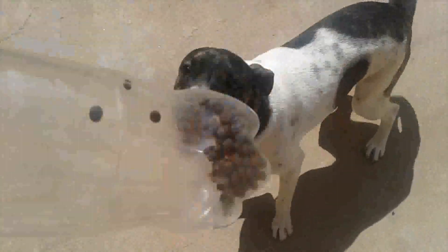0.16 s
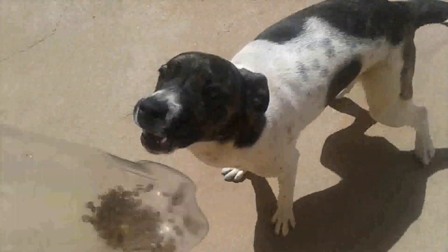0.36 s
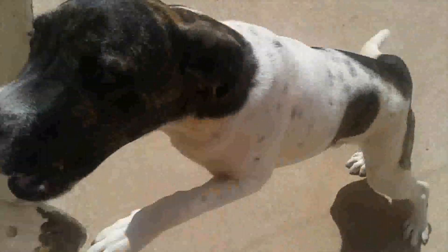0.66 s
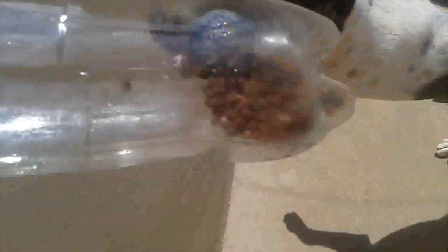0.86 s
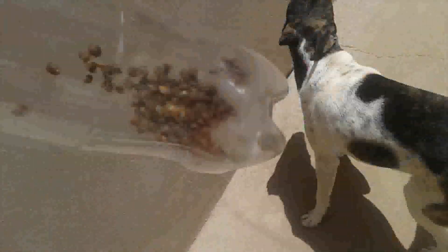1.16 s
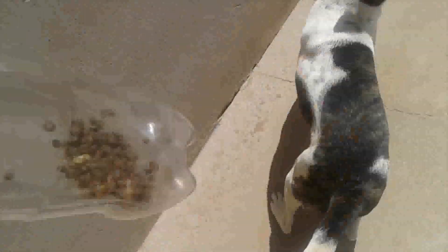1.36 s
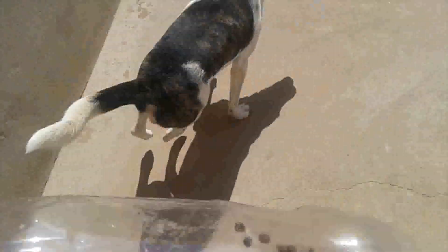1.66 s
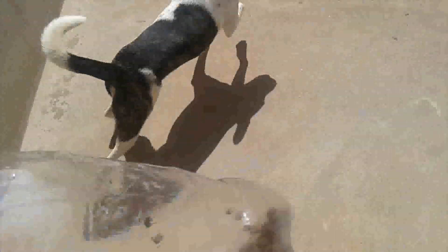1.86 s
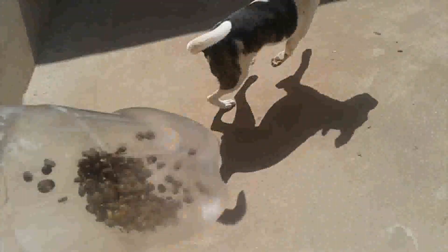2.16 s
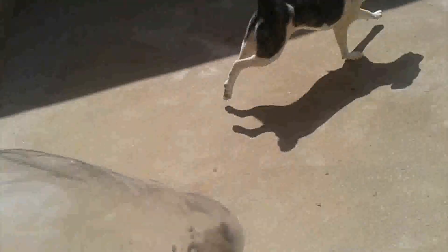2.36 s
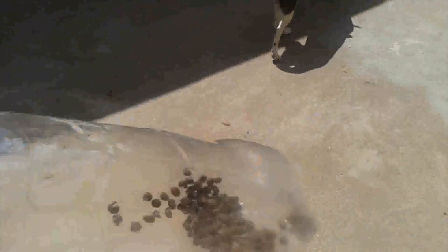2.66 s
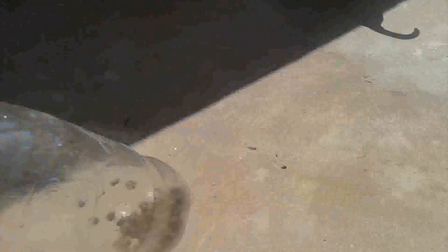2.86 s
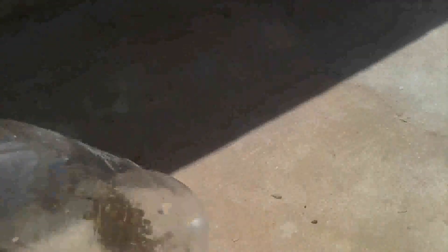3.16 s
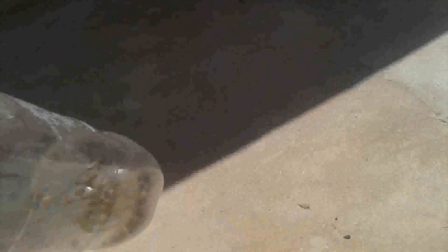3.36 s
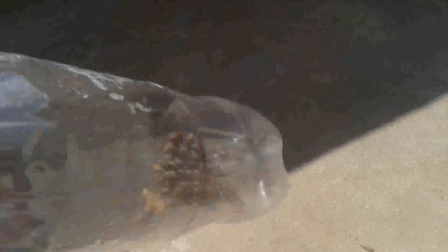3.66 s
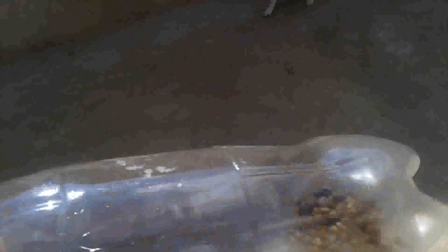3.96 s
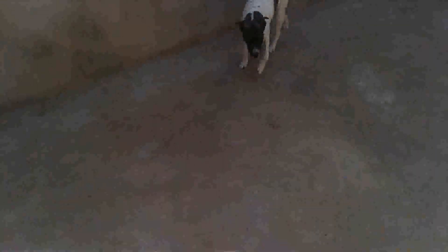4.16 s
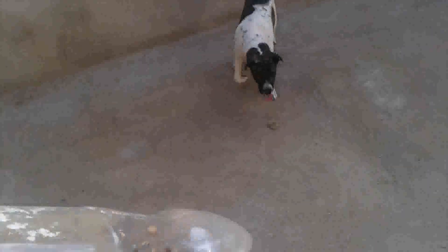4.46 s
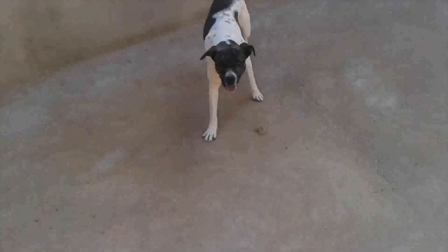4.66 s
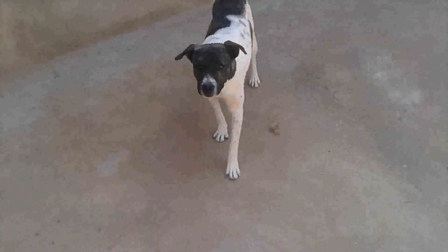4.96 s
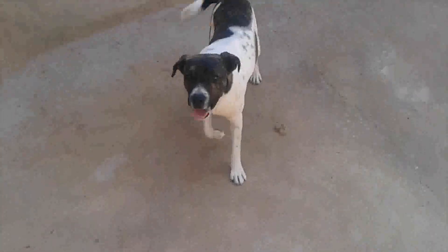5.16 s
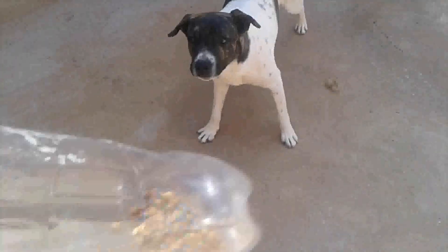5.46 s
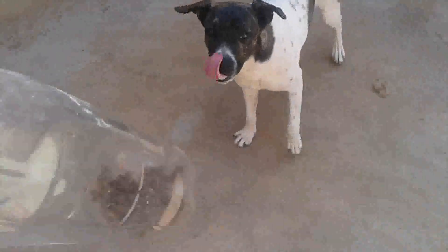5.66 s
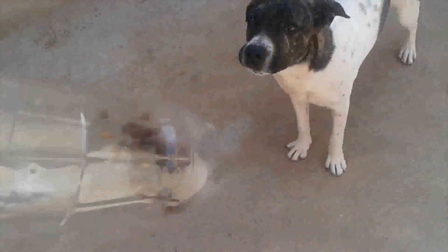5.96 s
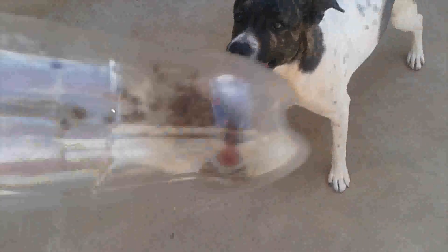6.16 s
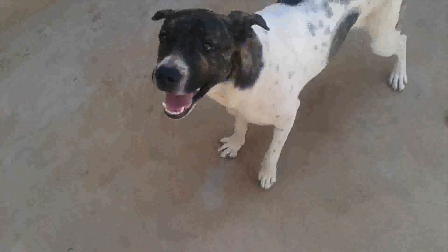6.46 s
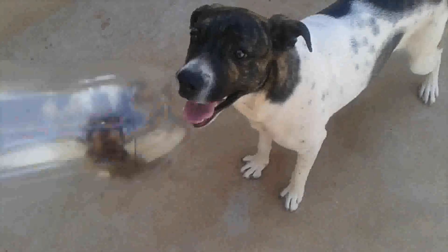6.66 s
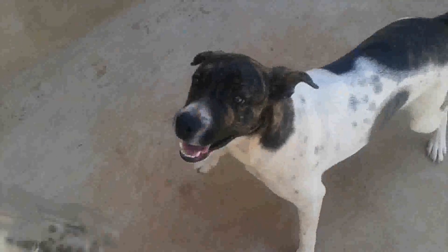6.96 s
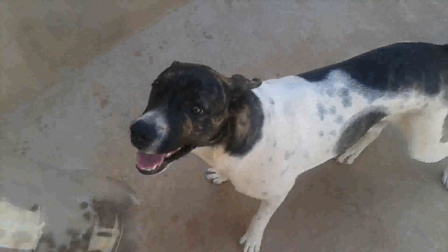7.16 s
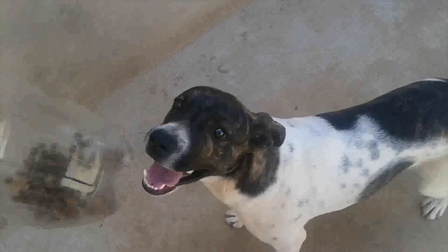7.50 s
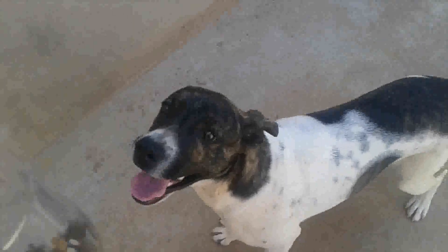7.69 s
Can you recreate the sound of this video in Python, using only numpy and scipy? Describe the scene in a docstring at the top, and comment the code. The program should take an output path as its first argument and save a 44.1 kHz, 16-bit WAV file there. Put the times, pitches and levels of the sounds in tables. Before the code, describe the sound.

Dry kibble is shaken briskly in a hard plastic bottle close by, crunchy rattling bursts about eight a second, with one brief pause near the end.

```python
"""A handful of dry kibble is shaken in a capped plastic bottle, close to the microphone.
About eight times a second the heap lands: a shower of random impacts excites the wall's short modes,
with another ring each time, and pellets tumble between. They settle once in a short pause near 6.5 s,
then the shaking goes on to the end. Filtered noise gives the air's tail and a quiet yard;
wavering sines give a faint, uneven mains hum and drone that nearly vanish near 5.7 s."""
import sys
import numpy as np
from scipy import signal
from scipy.fft import rfft, irfft
from scipy.io import wavfile
from scipy.ndimage import uniform_filter1d

SR = 44100
rng = np.random.default_rng(int(sys.argv[2]) if len(sys.argv) > 2 else 0)


def to_wav(s):
    """Save 16-bit WAV."""
    ch = np.atleast_2d(s).T  # columns
    pcm = np.round(np.clip(ch, -1, 1) * 32767)  # PCM
    wavfile.write(sys.argv[1], SR, pcm.astype(np.int16))


N = 345303
TIME = np.arange(N) / SR
GRID_HZ = np.arange(40, 16000, 40)

# landings of the heap on the wall: first contact_s, relative level_db, crest_delay_s, fall_s,
# abruptness (0-1)
LANDINGS = [(0.022, -15.5, 0.01, 0.01, 0.63), (0.122, -16.5, 0.012, 0.0099, 0.8),
            (0.228, -15, 0.017, 0.01, 0.8), (0.384, -17.5, 0.031, 0.024, 0.4),
            (0.511, -15, 0.02, 0.026, 0.6), (0.628, -12.0, 0.011, 0.02, 0.5),
            (0.691, -14, 0.024, 0.031, 0.46), (0.833, -16.5, 0.035, 0.025, 0.74),
            (0.982, -12, 0.033, 0.025, 0.6), (1.128, -10.5, 0.019, 0.029, 0.4),
            (1.296, -12, 0.0165, 0.02, 0.0), (1.399, -13, 0.022, 0.014, 0.8),
            (1.54, -14, 0.019, 0.019, 0.88), (1.663, -13, 0.022, 0.02, 0.07),
            (1.811, -13.5, 0.013, 0.018, 0.0), (1.922, -13.5, 0.042, 0.021, 0.63),
            (2.094, -15.5, 0.021, 0.011, 0.9), (2.202, -14.5, 0.0058, 0.019, 0.6),
            (2.333, -12.5, 0.013, 0.013, 0.7), (2.44, -13.5, 0.014, 0.024, 0.0),
            (2.558, -15.5, 0.041, 0.022, 0.65), (2.702, -13.0, 0.016, 0.02, 0.35),
            (2.849, -13, 0.026, 0.015, 0.5), (2.972, -10.5, 0.017, 0.02, 0.2),
            (3.079, -12.5, 0.024, 0.033, 0.7), (3.221, -13, 0.01, 0.021, 0),
            (3.341, -12.5, 0.013, 0.02, 0.2), (3.455, -13.5, 0.023, 0.022, 0.2),
            (3.591, -13.5, 0.017, 0.016, 0.57), (3.698, -12.0, 0.03, 0.016, 0.53),
            (3.836, -16, 0.019, 0.024, 0.36), (3.954, -13.0, 0.016, 0.016, 0.36),
            (4.124, -20.5, 0.026, 0.011, 0.5), (4.258, -14.5, 0.028, 0.0088, 0.57),
            (4.396, -17.5, 0.014, 0.02, 0.55), (4.49, -15.0, 0.019, 0.016, 0.0),
            (4.605, -13, 0.025, 0.011, 0.05), (4.732, -14.5, 0.013, 0.021, 0.35),
            (4.839, -11.5, 0.034, 0.0079, 0.36), (4.978, -13, 0.013, 0.019, 0.2),
            (5.114, -12, 0.014, 0.015, 0.6), (5.238, -12, 0.0083, 0.016, 0.2),
            (5.361, -15, 0.029, 0.012, 0.57), (5.472, -13.0, 0.026, 0.0087, 0.45),
            (5.606, -14, 0.015, 0.012, 0.5), (5.73, -13, 0.014, 0.012, 0.05),
            (5.83, -13.5, 0.02, 0.014, 0.07), (5.942, -14.5, 0.025, 0.037, 0.46),
            (6.068, -13.5, 0.012, 0.021, 0.4), (6.192, -12.0, 0.006, 0.016, 0.6),
            (6.301, -13.5, 0.03, 0.018, 0.67), (6.467, -22, 0.011, 0.051, 0.2),
            (6.865, -14.5, 0.021, 0.0095, 0.6), (7, -12, 0.029, 0.034, 1.0),
            (7.147, -10.5, 0.022, 0.014, 0), (7.248, -10.5, 0.023, 0.022, 0.4),
            (7.405, -13, 0.027, 0.0092, 0.2), (7.534, -14.5, 0.038, 0.0083, 0.99),
            (7.725, -18, 0.012, 0.021, 0), (7.813, -17.5, 0.033, 0.008, 0)]


def undb(db):
    """The decibel is logarithmic: 20 dB is a factor of ten in amplitude."""
    return 10 ** (np.asarray(db) / 20)


def unit(x):
    """Energy normalization: scale so that the squares sum to one."""
    return x / np.sqrt(np.sum(x ** 2))


def curve(rows):
    """Linear interpolation in time: join (s, value) rows by straight lines."""
    return np.interp(TIME, *np.transpose(rows))


def spectrum(points):
    """Logarithmic frequency scale: join (Hz, dB) points by straight lines on it."""
    hz, db = np.transpose(points)
    return np.interp(np.log(GRID_HZ), np.log(hz), db)


def walk(rate):
    """Slow random fluctuation: normal values at the rate in Hz, joined by straight lines."""
    knots = np.arange(0, N / SR + 1, 1 / rate)
    return np.interp(TIME, knots, rng.standard_normal(len(knots)))


def burst(t60, size=3072):
    """High modal density: crowded modes act as noise that falls 60 dB in t60 seconds."""
    age = np.arange(size) / SR
    decay = np.exp(-np.log(1000) * age / t60)
    return unit(rng.standard_normal(size) * decay)


def colour(x, db, size=1024):
    """Minimum-phase filtering: a causal response of unit energy, shaped by a gain in dB on GRID_HZ."""
    gain = undb(np.interp(np.fft.rfftfreq(size, 1 / SR), GRID_HZ, db))
    # folding the cepstrum onto positive times makes the response causal
    cepstrum = irfft(np.log(gain))[:size // 2]
    cepstrum[1:] *= 2
    response = unit(irfft(np.exp(rfft(cepstrum, size))))
    return signal.fftconvolve(x, response)[:len(x)]


def swell(lag, rise, fall):
    """Growth and decay of power: rises to one at lag zero and drains away."""
    shape = 1.346  # 1 = pointed crest, 2 = rounded
    return np.exp(-np.abs(lag / np.where(lag < 0, rise, fall)) ** shape)


def heap_power():
    """Superposed impact power: a few pellets lead, a front arrives at once, the rest swells; some tumble on."""
    rise_s, rise_per_delay = .014, .15  # a heap that arrives spread out swells more slowly
    tumble_db, tumble_rise_s, tumble_fall_s = -13, .028, 0.11  # loose pellets set rolling
    lead_db, front_db, front_s = -7, 1, 0.0052  # for a fully abrupt landing
    power = np.full(N, 1e-8)
    for contact, db, delay, fall, abrupt in LANDINGS:
        near = slice(max(0, int((contact - .15) * SR)), int((contact + .6) * SR))
        age = TIME[near] - contact
        lead = undb(lead_db * abrupt * (age < 0)) ** 2
        shower = swell(age - delay, rise_s + rise_per_delay * delay, fall) * lead
        front = (abrupt * undb(front_db)) ** 2 * (age > 0) * np.exp(-np.abs(age) / front_s)
        tumble = swell(age - delay, tumble_rise_s, tumble_fall_s) * undb(tumble_db) ** 2
        power[near] += undb(db) ** 2 * (front + shower + tumble)
    return power


def impacts(power, full_rate, crowding, scatter_db, even_s, first_db, clack_db, stray_rate, stray_db):
    """Random point process: a harder landing brings more and stronger blows, and stray pellets stand out."""
    # short clacks, loud and soft, within and between the landings: time_s, relative level_db
    clacks = [(0.406, -26), (0.443, -23), (0.605, -13.5), (1.219, -16.5), (1.411, -11), (1.695, -10.5),
              (1.835, -12.5), (2.951, -19.5), (3.617, -22), (4.585, -17.5), (5.083, -18.5), (5.5, -13),
              (5.955, -10.5), (6.087, -13.5), (6.469, -16), (6.482, -18), (6.524, -21.5), (6.826, -29.5),
              (6.939, -20), (7.035, -20), (7.32, -15), (7.39, -18)]
    rate = full_rate * (power / power.max()) ** crowding  # blows per second
    hits = (rng.random(N) < rate / SR) * undb(scatter_db * rng.standard_normal(N))
    # the pellets share the heap's momentum, so a hard hit leaves less for its neighbours
    width = int(even_s * SR) + 1
    share = uniform_filter1d(uniform_filter1d(hits ** 2, width), width)
    hits *= np.sqrt(power / (np.abs(share) + 1e-6))
    # strays fly freely while the heap is off the wall
    airborne = power < np.mean(power)
    strays = rng.random(N) < stray_rate / SR
    hits += strays * airborne * np.sqrt(power) * undb(stray_db)
    # first contact of each landing
    for contact, db, _, _, abrupt in LANDINGS:
        hits[int(contact * SR)] += abrupt * undb(db + first_db)
    for s, db in clacks:
        hits[int(s * SR)] += undb(db + clack_db)
    return hits


def landing_spectrum(s, vary_db, vary_hz, peak_db, width_hz):
    """Load-dependent resonance: the heap loads the wall where it lands, so each landing rings differently."""
    # what the bottle radiates when struck: frequency_hz, relative density_db (per Hz)
    bottle = [(60, -43), (140, -24.5), (420, -12), (590, -10.5), (790, -4), (1030, -0.26), (1300, -4),
              (1600, -2.4), (2650, -4), (3300, -1.5), (5700, -6), (8400, -20), (11500, -32.5),
              (15000, -40.5)]
    # centres of thump, base ring, side-wall ring, pellet contact and crisp edge: frequency_hz
    region_hz = [420, 950, 1850, 3700, 8000]
    # ring as the bottle tilts and the heap lands elsewhere, before chance variation:
    # time_s, base_ring_db, side_ring_db, thump_and_crisp_db, side_ring_hz
    wall_ring = [(0.0, -8, 1, 0, 1920), (0.45, 1.5, 9.5, 5, 1750), (0.87, -0.5, 5.5, 3, 1730),
                 (1.01, -8, -2.5, 0.5, 2330), (1.16, -6, 9, 3.5, 1670), (1.55, -3.5, 4.5, 3.5, 2300),
                 (2.1, 0.5, -1.5, -2, 2110), (3.3, 0, 0.5, 0, 2070), (4.0, 0.5, -2, -3, 1970),
                 (4.9, 0, -2.5, -3.5, 1840), (5.701, 2, 1.5, 0.5, 2350), (5.97, 0, 6, -2.5, 1610),
                 (6.25, -2.5, 3, -2, 2330), (6.5, 4, 12, -0.5, 1530), (6.9, -5.5, 2.5, -1, 1650),
                 (7.8, 2.5, 3.5, -2, 1680)]
    thump_db = 1.4  # the thump's lead over the crisp edge, before chance variation
    times, *columns = np.transpose(wall_ring)
    base, side, crisp, side_hz = (np.interp(s, times, column) for column in columns)
    chance = rng.standard_normal(len(region_hz) + 1)
    region_db = np.array([thump_db + crisp, base, side, 0, crisp]) + vary_db * chance[1:]
    peak_hz = side_hz + vary_hz * chance[0]
    peak = peak_db / (1 + (2 * (GRID_HZ - peak_hz) / width_hz) ** 2)
    return spectrum(bottle) + spectrum(list(zip(region_hz, region_db))) + peak


def spot_ring(wall_db, spot_db, width_hz, crack_t60, ring_t60, ring_db, count=200):
    """Position-dependent modal excitation: a spot favours its own modes in a crack and a short ring."""
    favour = np.interp(GRID_HZ / width_hz, np.arange(count), rng.standard_normal(count))
    decay = burst(crack_t60) + undb(ring_db) * burst(ring_t60)
    return unit(colour(decay, wall_db + spot_db * favour))


def rattle(hits, count=8):
    """Impulse-response convolution: in each shake the pellets strike a fresh handful of wall spots."""
    spot = rng.integers(0, count, N)
    crests = np.array([contact + delay for contact, _, delay, *_ in LANDINGS])
    # each shake extends halfway to its neighbours' crests
    edges = np.r_[0, (crests[:-1] + crests[1:]) / 2 * SR, N].astype(int)
    out = np.zeros(N + SR)
    for crest, start, end in zip(crests, edges, edges[1:]):
        wall_db = landing_spectrum(crest, vary_db=1, vary_hz=109, peak_db=4.5, width_hz=310)
        for k in range(count):
            ring = spot_ring(wall_db, spot_db=4.5, width_hz=200, crack_t60=0.012, ring_t60=0.037, ring_db=3.0)
            spot_hits = hits[start:end] * (spot[start:end] == k)
            sound = signal.fftconvolve(spot_hits, ring)
            out[start:start + len(sound)] += sound
    return out[:N]


def snap(hits, power, hardening, t60, edge_hz):
    """Contact time sets bandwidth: faster pellets touch more briefly, so a landing's crest is brightest."""
    hard = hits * (power / power.max()) ** hardening
    band = signal.butter(2, [min(edge_hz, 9000), 11000], "band", fs=SR, output="sos")
    bright = signal.sosfilt(band, burst(t60))
    return signal.fftconvolve(hard, unit(bright))[:N]


def bottle_air(wall):
    """Reverberation: the air inside the bottle rings on as a decaying tail of the wall's sound."""
    return signal.fftconvolve(wall, burst(t60=0.21, size=16384))[:N]


def hum(hum_db, drone_db):
    """Frequency and amplitude modulation: an uneven mains hum wavers, with a weaker drone just above it."""
    # shared level of hum and drone before their wavering and gains: time_s, relative level_db
    hum_levels = [(0.1, -52), (0.6, -44), (1.1, -48.5), (1.7, -52), (2.3, -45), (3.0, -45.5), (3.7, -45),
                  (4.3, -49.5), (5.0, -44), (5.4, -53), (5.7, -71), (6.1, -54), (6.5, -53), (6.9, -45.5),
                  (7.6, -44)]
    mains_hz = 120.0 + 0.48 * walk(7.1)
    mains = np.sin(2 * np.pi * np.cumsum(mains_hz) / SR) * undb(hum_db + 2.8 * walk(10))
    drone_hz = 146.0 + 2.4 * walk(9)
    drone = np.sin(2 * np.pi * np.cumsum(drone_hz) / SR) * undb(drone_db + 1.9 * walk(4.6))
    # the root of two gives a sine of unit amplitude an rms of one
    return np.sqrt(2) * undb(curve(hum_levels)) * (mains + drone)


def quiet_yard():
    """Spectral shaping of noise: steady random sound takes the colour of a quiet yard."""
    # quiet yard: frequency_hz, relative density_db (per Hz)
    yard_points = [(20, -28), (50, -19.5), (105, 2.5), (150, -6.5), (250, -8.5), (700, -5.5), (2000, -15.5),
                   (6000, -16), (9000, -34), (15000, -34)]
    return colour(rng.standard_normal(N), spectrum(yard_points), size=4096)


def scene():
    """Linear superposition: the rattling wall and the air ringing inside it, over the hum and the yard."""
    power = heap_power()
    hits = impacts(power, full_rate=2100, crowding=.25, scatter_db=4.5, even_s=0.0094, first_db=20,
                   clack_db=23.5, stray_rate=6, stray_db=26)
    edge = snap(hits, power, hardening=0.45, t60=.014, edge_hz=6000)
    wall = undb(0.6) * rattle(hits) + undb(-23) * edge
    air = undb(-15.5) * bottle_air(wall)
    yard = undb(-45.5) * quiet_yard()
    return (wall + air + hum(hum_db=0.1, drone_db=-9) + yard)[None]


def record(dry):
    """Saturation and band limiting: the microphone rounds the tallest peaks and the top is cut."""
    ceiling, top_hz = 1.4, 15200
    rounded = ceiling * np.tanh(dry / ceiling)
    return signal.sosfilt(signal.ellip(10, .2, 90, top_hz, fs=SR, output="sos"), rounded)


dry = scene()
out = record(dry)
to_wav(out)
```